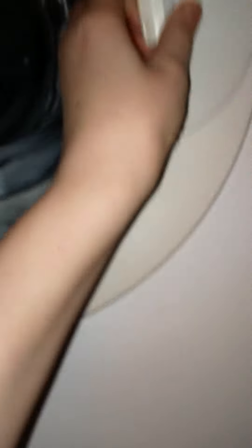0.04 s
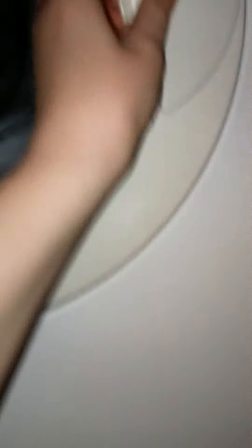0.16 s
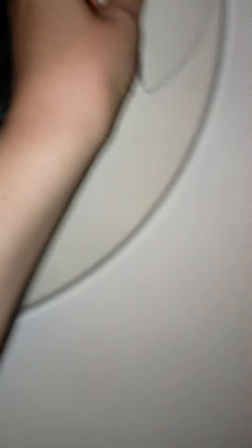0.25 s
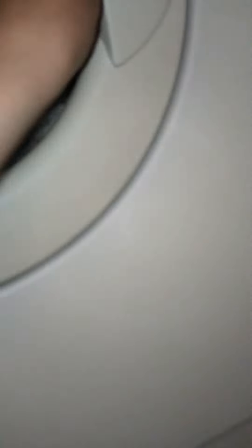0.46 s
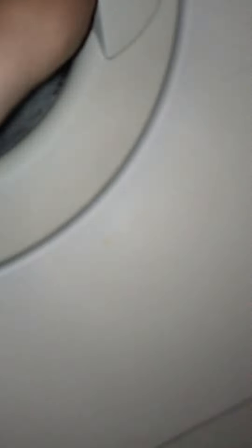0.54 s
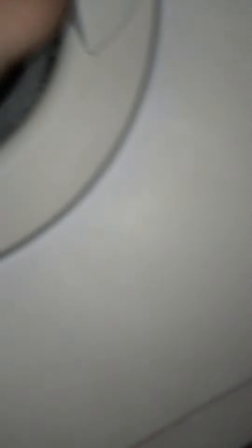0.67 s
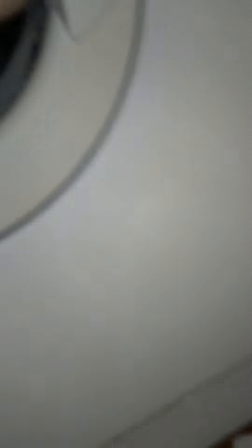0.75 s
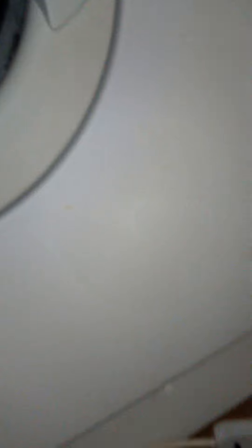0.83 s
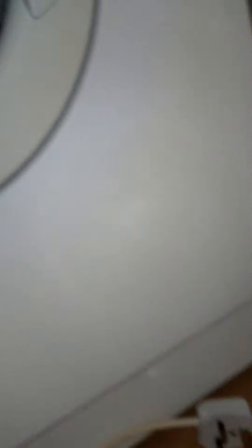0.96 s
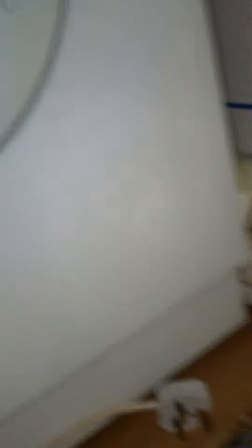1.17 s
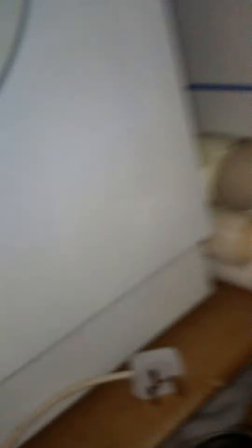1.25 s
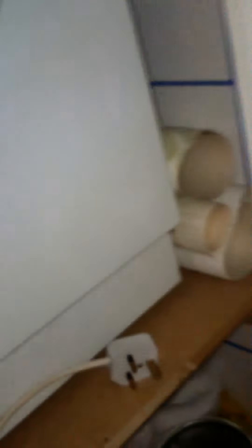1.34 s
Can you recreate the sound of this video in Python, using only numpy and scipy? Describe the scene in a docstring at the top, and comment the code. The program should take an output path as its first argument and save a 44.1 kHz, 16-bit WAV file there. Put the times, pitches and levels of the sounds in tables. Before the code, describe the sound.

A washing machine door shuts close by in a small quiet room: a plastic click, a brief squeak, a snap with a deep thump, a few settling clicks, a fading cabinet boom, then faint cloth rustle.

```python
"""A washing machine door is pushed shut close by in a small quiet room: modal rings plus a noise knock.
The plastic hook touches the catch (noise cracks with ringing parts), squeaks along it (stick-slip
partials) and snaps in; the door thumps and the steel cabinet booms on as slowly fading noise.
The latch settles with a few clicks, then cloth rustles and a grip shifts with soft bumps and a faint
hollow tone, as shaped noise and sines. Low rumble and faint hiss lie underneath."""
import sys
import numpy as np
from scipy import signal
from scipy.fft import rfft, irfft, next_fast_len
from scipy.io import wavfile
from scipy.ndimage import map_coordinates

SR = 44100
rng = np.random.default_rng(int(sys.argv[2]) if len(sys.argv) > 2 else 0)


def generate_wav(sig):
    """Save sig (samples, or channels by samples) to the path in sys.argv[1] as 16-bit PCM at SR."""
    pcm = np.round(np.clip(np.atleast_2d(sig).T, -1, 1) * 32767).astype(np.int16)
    wavfile.write(sys.argv[1], SR, pcm)


N = 61739  # length in samples

# Spectra below are noise colours: only their shape counts, since noise() sets the level to rms 1.
# low rumble, spectrum: f/Hz, density/dB
RUMBLE_COLOUR = [(20, -12), (45, 10), (85, 4), (150, -3), (250, -12.5), (380, -30), (600, -19.5),
                 (1500, -23.5), (4000, -37), (10000, -31), (14500, -32.5)]
RUMBLE_DB = -57.5
# faint hiss: t/s, level/dB
HISS_LEVEL = [(0, -68), (.3, -62), (.55, -67), (.75, -67.5), (.9, -76.5), (1.4, -67)]
# hiss spectrum: f/Hz, density/dB
HISS_SPECTRUM = [(300, 0), (2000, 4), (4000, 2), (7000, -3.5), (10000, -6), (14500, -6)]

# latch clicks: t/s, crack level before the shelf/dB, treble shelf/dB, decay t60/s,
# ring relative to crack/dB, crack's side gain before the width filter/dB
LATCH_CLICKS = [(0.0416, -32, 0.5, 0.041, 4, -32), (0.1947, -45, 10, 0.069, -5, -30),
                (.1985, -34, -12, 0.026, -10, -21), (0.2081, -39, 4.5, 0.079, -18, 0.5),
                (0.2637, -44, 4.5, 0.072, -13, 2), (0.274, -48, 6.5, 0.051, -11, -10),
                (0.321, -55, -12, .03, -6, -2), (0.334, -41, -19, 0.068, -8, 7),
                (0.356, -37, -24, 0.03, -20, 10), (.390, -52.5, -0.5, 0.12, -21, 1),
                (0.393, -51, 6.5, 0.024, -26, 2), (0.4249, -37, 0, 0.031, -18, -6),
                (0.429, -31, -13, 0.095, -0.5, -21), (0.445, -42, -16, 0.098, -9, -18)]
# crack of plastic, spectrum: f/Hz, density/dB
PLASTIC_COLOUR = [(300, -32), (600, -24), (800, -10), (1030, -1), (1450, -7), (1900, -3), (2350, 2),
                  (2900, -3), (3700, 1), (5000, -5), (6800, -10), (9000, -7), (13000, -11)]
# ringing latch parts: f/Hz, level/dB, decay t60/s
LATCH_MODES = [(1021, -13, .14), (2310, -3.5, 0.026), (2450, 1.5, 0.019), (2705, -4.5, 0.016),
               (3597, -17, .07)]
CLICK_ATTACK_S = 0.00095
TREBLE_FROM_HZ, TREBLE_FULL_HZ = 1430, 8100  # the shelf starts and reaches its full value
# decay of the room's answer: f/Hz, t60/s
ROOM_DECAY = [(100, 1), (1000, 0.35), (2400, 0.16), (3600, 0.2), (5000, 0.14), (14000, 0.19)]
ROOM_DB, ROOM_RISE_S = -9.5, 0.0048

# short swells around the blows, mostly low: t/s, level/dB, f/Hz, length/s
DOOR_SWELLS = [(0.049, -22.5, 88, 0.017), (0.093, -25, 74.4, 0.027), (.178, -35, 385, 0.03),
               (0.185, -25, 75, 0.029), (0.214, -14.5, 70.4, 0.031)]
# blows of the door on its frame: t/s, level/dB, softness as loss in dB per kHz
DOOR_BLOWS = [(.045, -28, 8), (0.2064, -9.5, 2.5)]
# modes of door and front panel: f/Hz, level/dB, decay t60/s, rise/s
DOOR_MODES = [(41.6, -14, .4, 0.012), (60.6, -5.5, .3, .014), (88, -0.5, 0.31, 0.014),
              (88.53, -26, 1.88, 0.014), (156.8, -27, 0.57, 0.022), (197, -20, 0.22, 0.0073),
              (301.7, -14, 0.294, 0.012), (362.3, 6, 0.099, 0.0097), (385.3, -5, 0.12, 0.009),
              (803, -18.5, 0.15, 0.0023), (942, -7.5, 0.11, 0.002), (976.5, -6, 0.044, 0.003),
              (1121, -7, 0.044, 0.0012), (1247, -20, 0.064, 0.0012)]
# dull knock, spectrum: f/Hz, density/dB
KNOCK_COLOUR = [(200, -22), (500, -25.5), (720, -6.5), (900, -5), (1120, -4), (1500, -13), (2200, -16.5),
                (3500, -46), (8000, -73)]
KNOCK_DB, KNOCK_RISE_S, KNOCK_T60_S = -7, 0.0006, 0.06
PANEL_DB, PANEL_RISE_S, PANEL_T60_S = -23.5, 0.011, 0.4  # the front panel's dense ring
# the cabinet's many slow modes, spectrum: f/Hz, density/dB
CABINET_COLOUR = [(20, -45), (40, 1.5), (85, -4), (120, -5.5), (150, -1), (200, -2), (235, -20), (310, -17),
                  (385, -19), (470, -32), (800, -29.5), (2000, -55), (8000, -90)]
CABINET_DB, CABINET_RISE_S, CABINET_T60_S = -15.5, 0.01, 1.064

# stick-slip of the hook: t/s, mean slip rate f/Hz, level/dB
HOOK_SLIPS = [(.134, 296, -42), (.144, 252, -46.5), (.157, 326, -40.5), (.172, 316, -41.5),
              (.183, 321, -39), (.197, 330, -33)]
# squeak partials: multiple of the slip rate, relative level/dB
HOOK_PARTIALS = [(1, 0.5), (2, -10), (3, -7.5), (4, -22)]
SQUEAK_JITTER, SQUEAK_ROUGH_DB = 0.025, 2.5  # share of the rate, and dB, per unit of wobble

# sleeve movement: t/s, level/dB
RUSTLE_LEVEL = [(.98, -73), (1.04, -64.5), (1.09, -57.5), (1.13, -59), (1.19, -63), (1.24, -59.5),
                (1.29, -60.5), (1.34, -62.5), (1.4, -79)]
# cloth spectrum: f/Hz, density/dB
CLOTH_COLOUR = [(200, -25), (600, -4), (1000, 0.5), (2000, 2.5), (3800, -1.5), (6000, -10), (7500, -9.5),
                (9300, -10), (14000, -18)]
# light scuffs of cloth: t/s, level before the shelf/dB, treble shelf/dB
CLOTH_SCUFFS = [(1.272, -69.5, 20.5), (1.294, -45.5, -14)]
SCUFF_RISE_S, SCUFF_T60_S = 0.0014, 0.1
# shifting grip: t/s, level/dB
GRIP_LEVEL = [(1.0, -63.5), (1.1, -63.5), (1.2, -62), (1.3, -45.5), (1.335, -48), (1.36, -48.5),
              (1.4, -60.5)]
# grip spectrum: f/Hz, density/dB
GRIP_COLOUR = [(25, 0), (70, -1.5), (130, -10.5), (190, -4), (250, -12), (340, -5), (400, -9), (470, -15.5),
               (700, -17), (1100, -22), (2000, -31.5), (5000, -49)]
# soft bumps of the grip: t/s, level/dB
GRIP_BUMPS = [(1.218, -40), (1.347, -46)]
BUMP_HZ, BUMP_S = 75, 0.021
# faint hollow tone: t/s, level/dB
HOLLOW_LEVEL = [(1.04, -87), (1.1, -66), (1.22, -60.5), (1.3, -54), (1.345, -68), (1.4, -62)]
HOLLOW_HZ, HOLLOW_WANDER_HZ = 396, 5.02  # centre pitch, wander per unit of wobble

# stereo width: f/Hz, gain of the side signal/dB
SIDE_GAIN = [(2000, -82), (3500, -41), (5500, -13.5), (9000, -4.5), (14000, -8)]
BASS_HZ, TOP_HZ = 18, 14400  # corners of the final band


def amp(db):
    """Decibels to gain."""
    return 10 ** (np.asarray(db) / 20)


def unit(x):
    """Scale to rms 1."""
    return x / np.sqrt(np.mean(x ** 2) + 1e-20)


def along(points, hz):
    """Read (f/Hz, value) points along a log frequency axis."""
    f, value = np.transpose(points)
    return np.interp(np.log(hz + 1), np.log(f + 1), value)


def curves(rows):
    """One value per sample for each column after the time; the end values hold."""
    s, *columns = np.transpose(rows)
    return [np.interp(np.arange(N) / SR, s, column) for column in columns]


def since(s):
    """Seconds since a moment, zero before it."""
    return np.maximum(np.arange(N) / SR - s, 0)


def struck(t, rise, t60):
    """Envelope of a struck body: quick rise and exponential decay."""
    return (1 - np.exp(-t / rise)) * amp(-60 * t / t60)


def wobble(rate):
    """A smooth random curve through normal knots, rate knots a second."""
    knots = rng.standard_normal(2000)
    return map_coordinates(knots, [np.arange(N) * rate / SR], mode="mirror")


def filtered(x, response):
    """Shape x by a response of frequency."""
    m = next_fast_len(N + SR // 2)
    hz = np.fft.rfftfreq(m, 1 / SR)
    return irfft(rfft(x, m) * response(hz), m)[..., :N]


def noise(spectrum):
    """Coloured noise of rms 1, as a mid and a side row."""
    white = rng.standard_normal((2, N))
    return unit(filtered(white, lambda hz: amp(along(spectrum, hz))))


def brighter(x, treble_db):
    """Lift or lower the treble by a shelf."""
    shelf = [(TREBLE_FROM_HZ, 0), (TREBLE_FULL_HZ, treble_db)]
    return filtered(x, lambda hz: amp(along(shelf, hz)))


def middle(x):
    """A sound with no side part."""
    return np.array([x, np.zeros(N)])


def background():
    """Steady low room rumble and a faint hiss of varying level, both coloured noise."""
    rumble = amp(RUMBLE_DB) * noise(RUMBLE_COLOUR)
    hiss = amp(curves(HISS_LEVEL)[0]) * noise(HISS_SPECTRUM)
    return rumble + hiss


def latch():
    """Each click is a short noise crack of plastic that rings the latch parts as decaying sines."""
    out = np.zeros((2, N))
    for s, db, treble_db, t60, ring_db, side_db in LATCH_CLICKS:
        t = since(s)
        crack = brighter(noise(PLASTIC_COLOUR), treble_db) * struck(t, CLICK_ATTACK_S, t60)
        crack = crack * amp([[0], [side_db]])
        ring = np.zeros(N)
        for hz, level, life in LATCH_MODES:
            # every click excites the parts a little differently
            gain = amp(level + rng.normal(0, 1))
            pitch = hz * rng.normal(1, 0.008)
            ring += gain * struck(t, CLICK_ATTACK_S, life) * np.sin(2 * np.pi * pitch * t)
        out += amp(db) * (crack + amp(ring_db) * middle(ring))
    return out


def room(x):
    """The small room's answer to the mid: a diffuse noise tail whose bass lingers longest."""
    hz, t, z = signal.stft(rng.standard_normal((2, SR // 2)), SR, nperseg=256)
    decay = amp(-60 * t / along(ROOM_DECAY, hz)[:, None])
    tail = signal.istft(z * decay, SR, nperseg=256)[1]
    tail = tail * (1 - np.exp(-np.arange(tail.shape[1]) / SR / ROOM_RISE_S))
    tail = tail / np.linalg.norm(tail[0])
    return signal.fftconvolve(x[:1], tail, axes=1)[:, :N]


def swell(s, db, hz, length):
    """A short burst of sine cycles that swells and fades."""
    t = np.minimum(since(s), length)
    envelope = np.sin(np.pi * t / length)
    return middle(amp(db) * envelope * np.sin(2 * np.pi * hz * t))


def door():
    """Blows knock dully and ring the door and panel modes, softened in the treble, amid short swells."""
    out = np.zeros((2, N))
    for s, db, softness in DOOR_BLOWS:
        t = since(s)
        ring = np.zeros(N)
        for hz, level, t60, rise in DOOR_MODES:
            ring += amp(level) * struck(t, rise, t60) * np.sin(2 * np.pi * hz * t)
        knock = amp(KNOCK_DB) * struck(t, KNOCK_RISE_S, KNOCK_T60_S)
        panel = amp(PANEL_DB) * struck(t, PANEL_RISE_S, PANEL_T60_S)
        blow = middle(ring) + (knock + panel) * noise(KNOCK_COLOUR)
        out += amp(db) * filtered(blow, lambda hz: amp(-abs(softness) * hz / 1000))
    return out + sum(swell(*row) for row in DOOR_SWELLS)


def cabinet():
    """The steel cabinet and drum boom on after each blow: dense low modes as decaying noise."""
    out = np.zeros((2, N))
    for s, db, _ in DOOR_BLOWS:
        boom = noise(CABINET_COLOUR) * struck(since(s), CABINET_RISE_S, CABINET_T60_S)
        out += amp(db + CABINET_DB) * boom
    return out


def squeak():
    """The hook sticks and slips unevenly along the catch: rough partials of a jittering slip rate."""
    rate, db = curves(HOOK_SLIPS)
    uneven_rate = rate * (1 + SQUEAK_JITTER * wobble(249))
    phase = 2 * np.pi * np.cumsum(uneven_rate) / SR
    tone = np.zeros(N)
    for k, level in HOOK_PARTIALS:
        tone += amp(level + SQUEAK_ROUGH_DB * wobble(143)) * np.sin(round(k) * phase)
    sliding = (since(HOOK_SLIPS[0][0]) > 0) & (since(HOOK_SLIPS[-1][0]) == 0)
    return middle(unit(tone) * amp(db) * sliding)


def cloth():
    """A sleeve rustles as fluttering noise; its scuffs are short decaying bursts."""
    out = amp(curves(RUSTLE_LEVEL)[0] + 1.55 * wobble(120)) * noise(CLOTH_COLOUR)
    for s, db, treble_db in CLOTH_SCUFFS:
        burst = brighter(noise(CLOTH_COLOUR), treble_db)
        out += amp(db) * struck(since(s), SCUFF_RISE_S, SCUFF_T60_S) * burst
    return out


def grip():
    """A shifting grip rubs as unsteady, bass-heavy noise and gives soft low bumps."""
    rub = amp(curves(GRIP_LEVEL)[0] + 1.8 * wobble(50.16)) * noise(GRIP_COLOUR)
    return rub + sum(swell(s, db, BUMP_HZ, BUMP_S) for s, db in GRIP_BUMPS)


def hollow_tone():
    """A faint hollow tone: one sine wandering in pitch and level."""
    pitch = HOLLOW_HZ + HOLLOW_WANDER_HZ * wobble(59.9)
    tone = unit(np.sin(2 * np.pi * np.cumsum(pitch) / SR))
    return middle(amp(curves(HOLLOW_LEVEL)[0] + 1.2 * wobble(42.1)) * tone)


def scene():
    """Mix all sources; only the clicks echo in the room, and the stereo spread is in the treble."""
    clicks = latch()
    mix = background() + clicks + amp(ROOM_DB) * room(clicks)
    mix = mix + door() + cabinet() + squeak()
    mid, side = mix + cloth() + grip() + hollow_tone()
    side = filtered(side, lambda hz: amp(along(SIDE_GAIN, hz)))
    return np.array([mid + side, mid - side])


def record(dry):
    """Roll off the deepest bass gently and cut steeply at the top of the band."""
    def band(hz):
        bass_cut = 1j * hz / (BASS_HZ + 1j * hz)
        return bass_cut / np.sqrt(1 + (hz / TOP_HZ) ** 240)
    return filtered(dry, band)


dry = scene()
out = record(dry)
generate_wav(out)
```